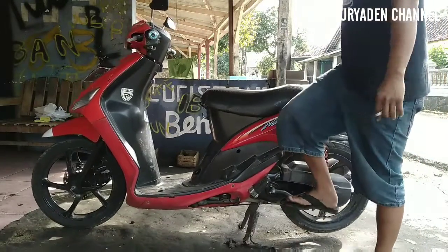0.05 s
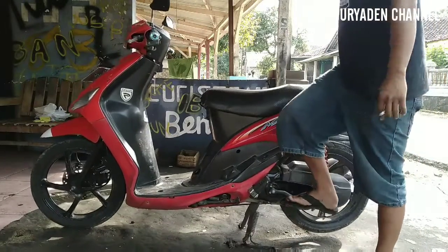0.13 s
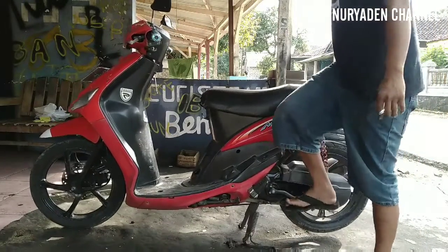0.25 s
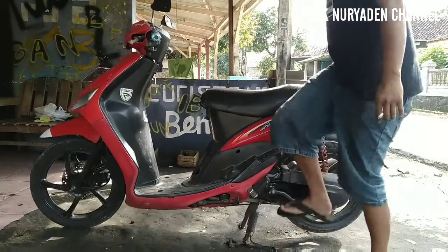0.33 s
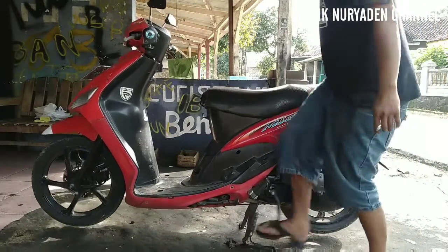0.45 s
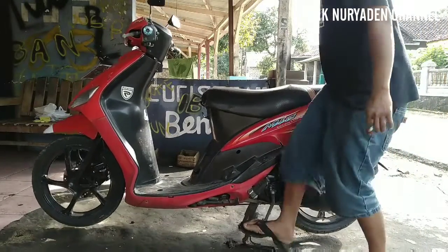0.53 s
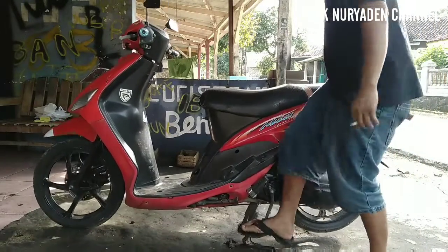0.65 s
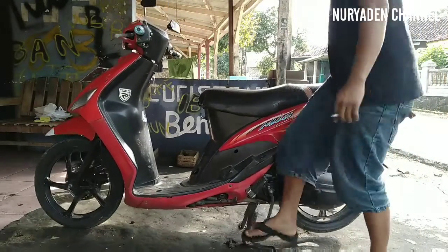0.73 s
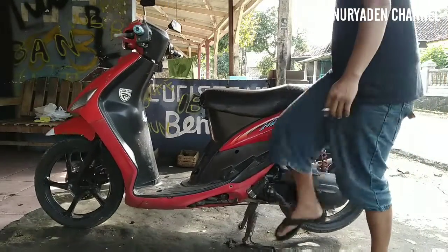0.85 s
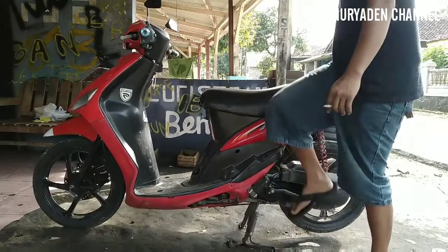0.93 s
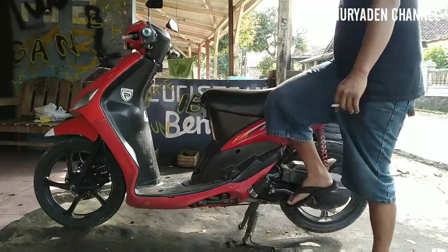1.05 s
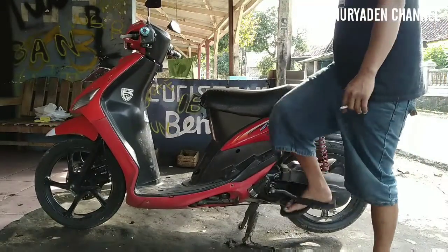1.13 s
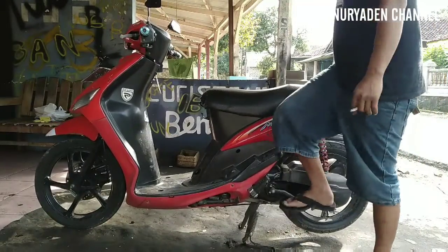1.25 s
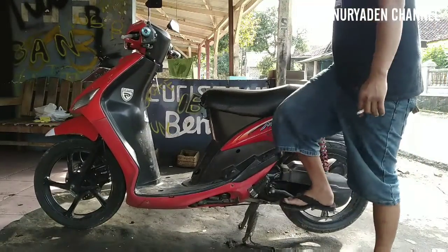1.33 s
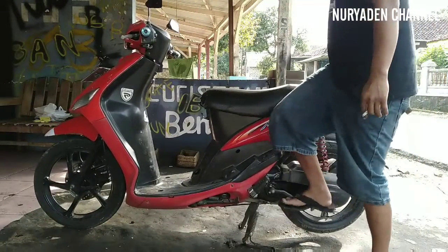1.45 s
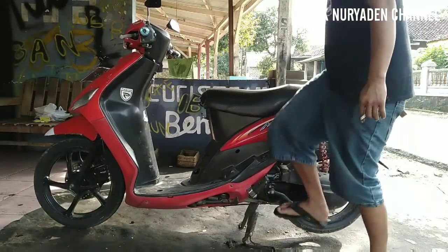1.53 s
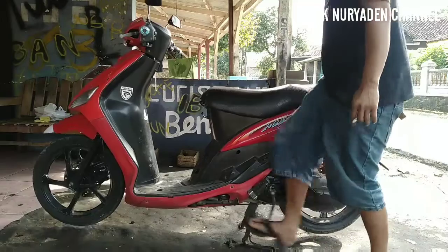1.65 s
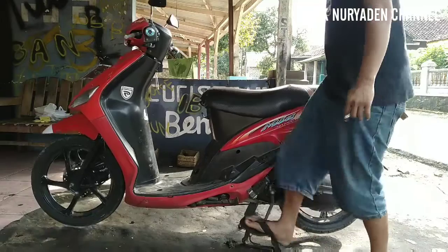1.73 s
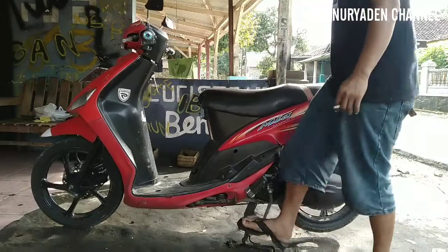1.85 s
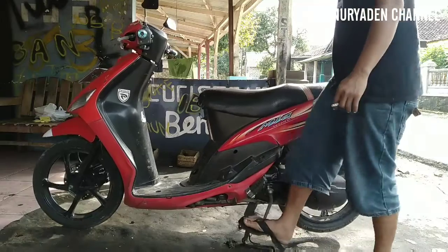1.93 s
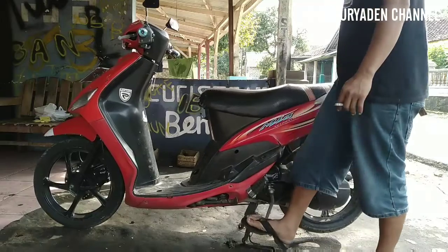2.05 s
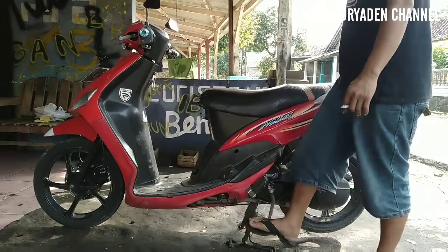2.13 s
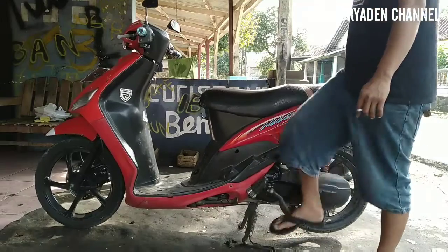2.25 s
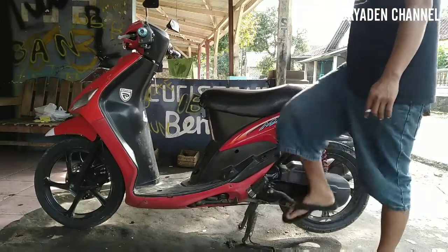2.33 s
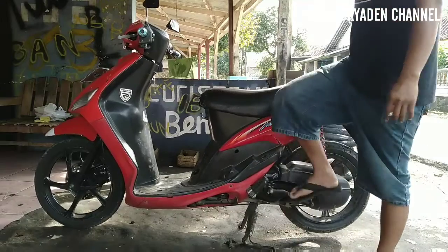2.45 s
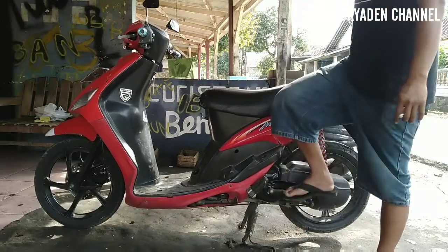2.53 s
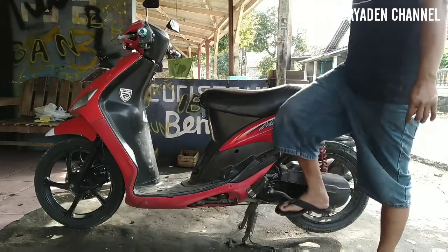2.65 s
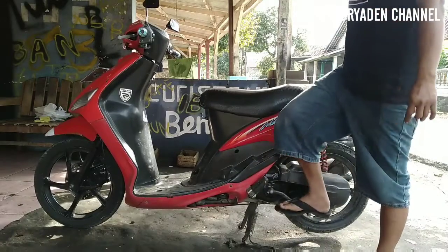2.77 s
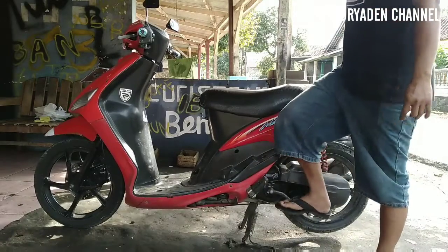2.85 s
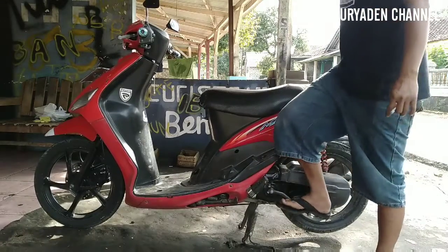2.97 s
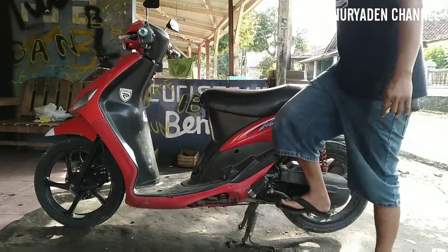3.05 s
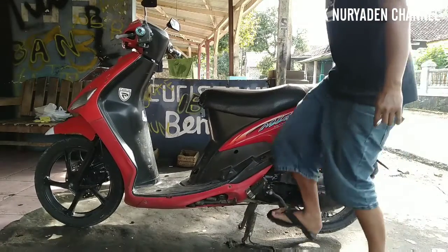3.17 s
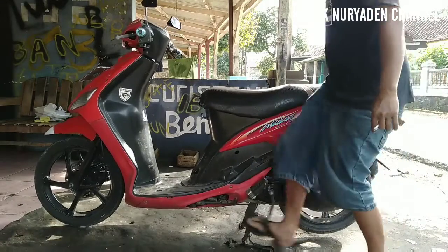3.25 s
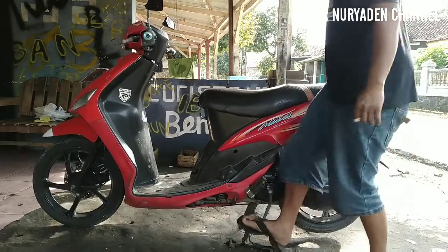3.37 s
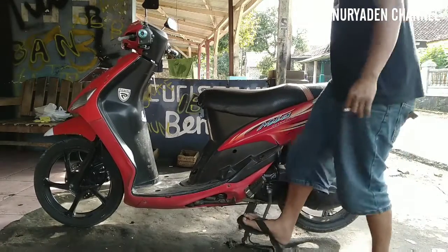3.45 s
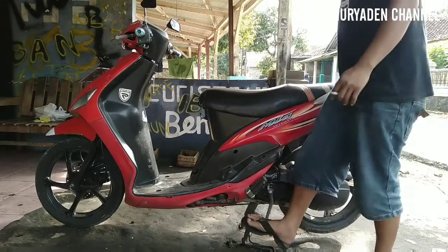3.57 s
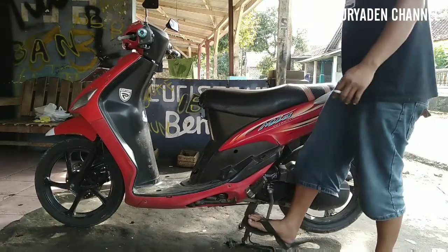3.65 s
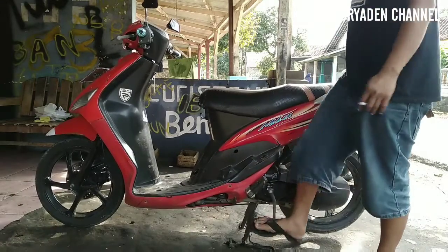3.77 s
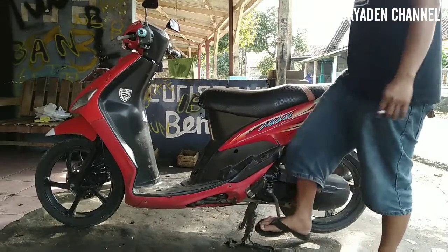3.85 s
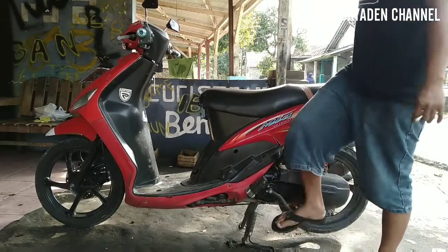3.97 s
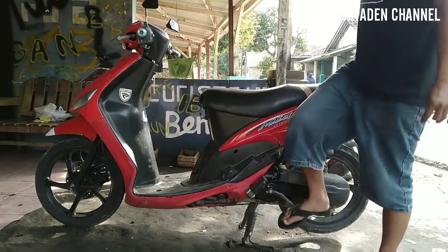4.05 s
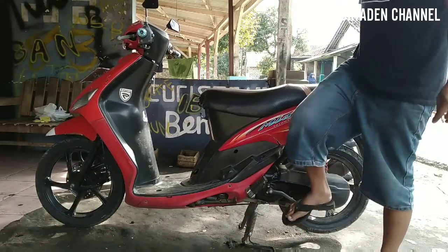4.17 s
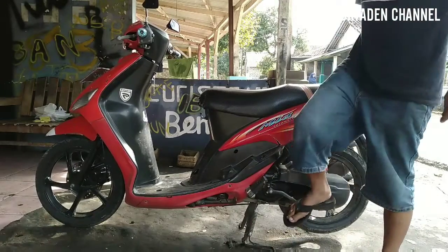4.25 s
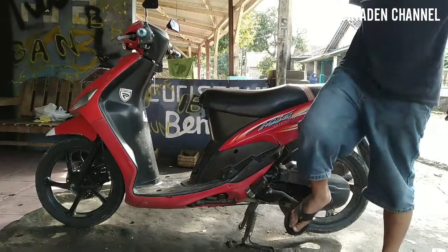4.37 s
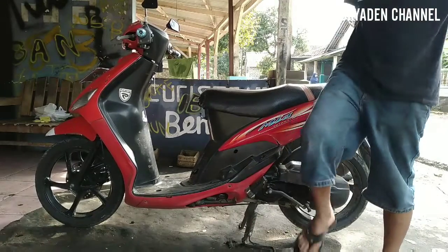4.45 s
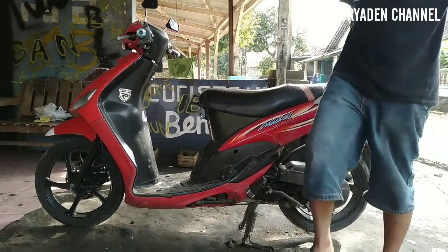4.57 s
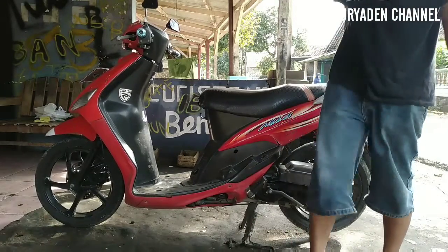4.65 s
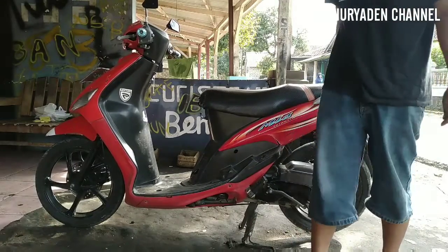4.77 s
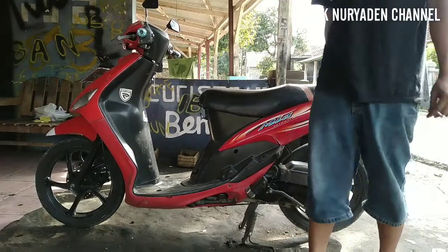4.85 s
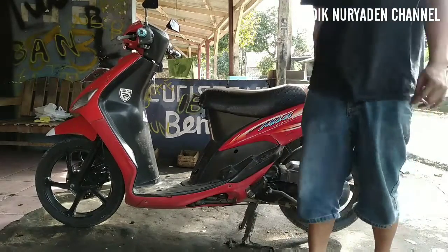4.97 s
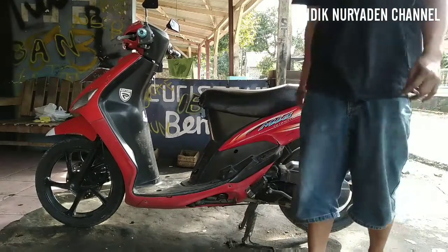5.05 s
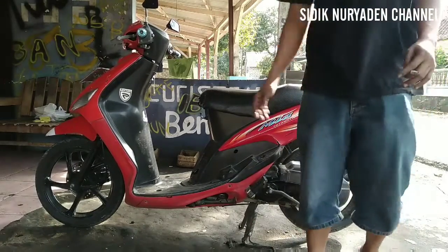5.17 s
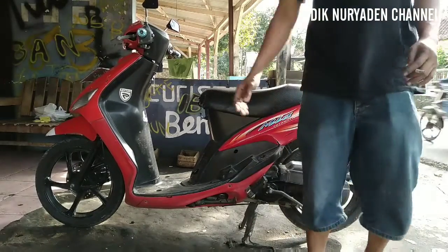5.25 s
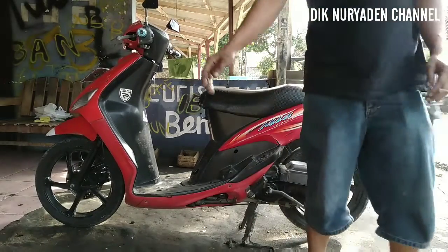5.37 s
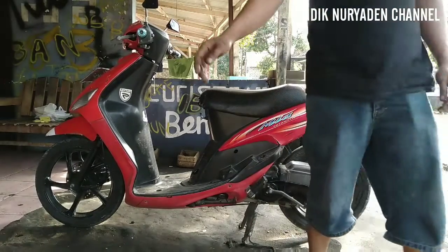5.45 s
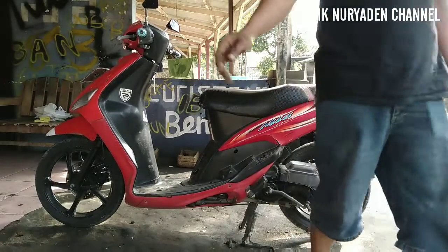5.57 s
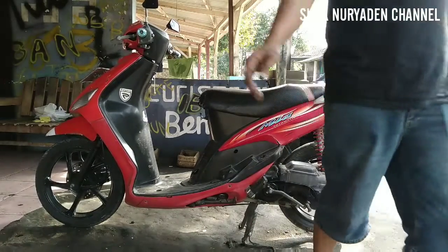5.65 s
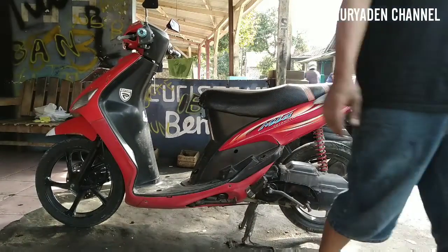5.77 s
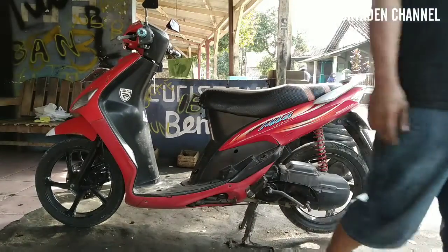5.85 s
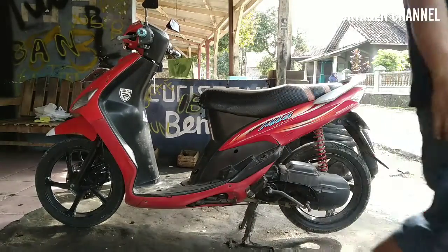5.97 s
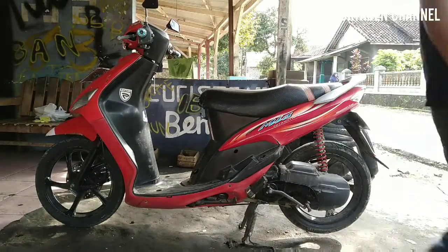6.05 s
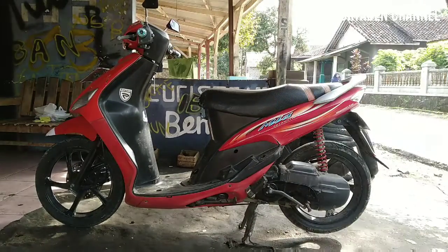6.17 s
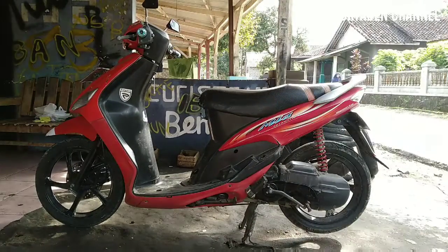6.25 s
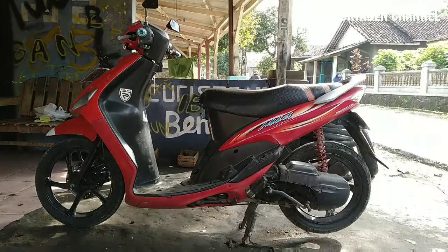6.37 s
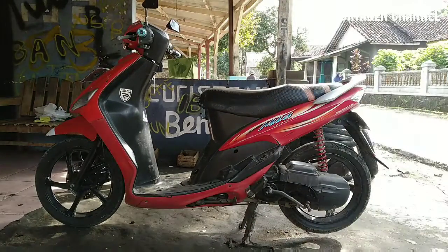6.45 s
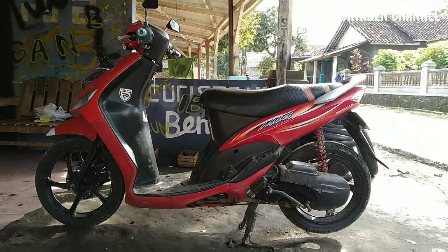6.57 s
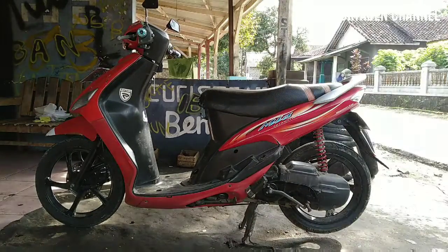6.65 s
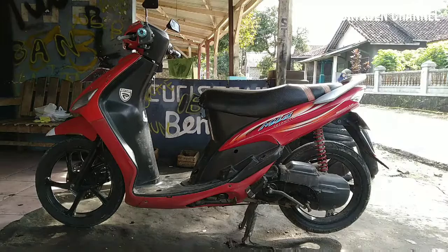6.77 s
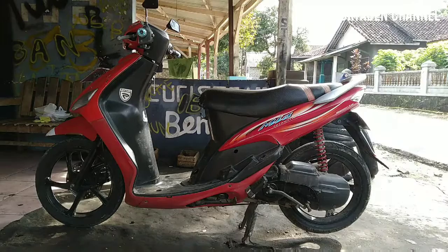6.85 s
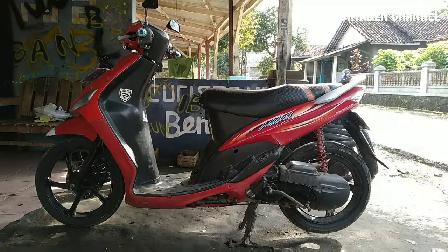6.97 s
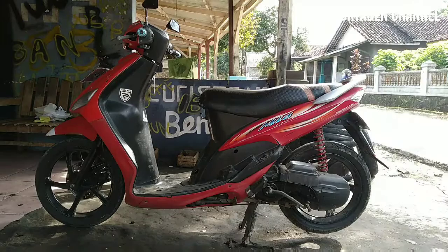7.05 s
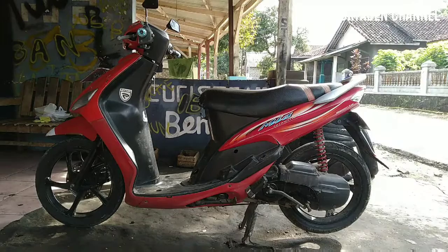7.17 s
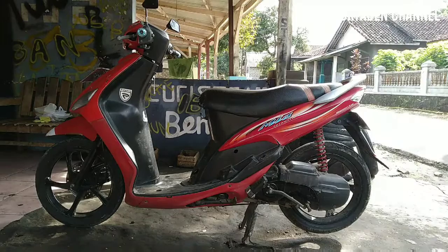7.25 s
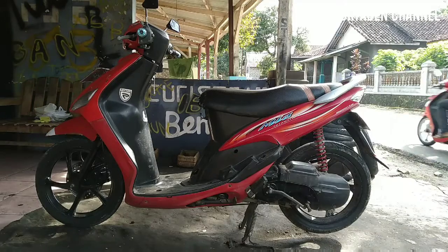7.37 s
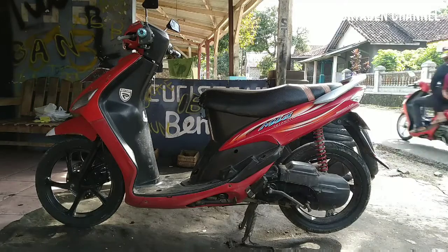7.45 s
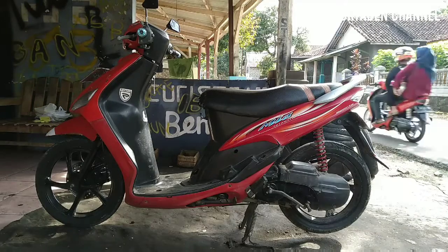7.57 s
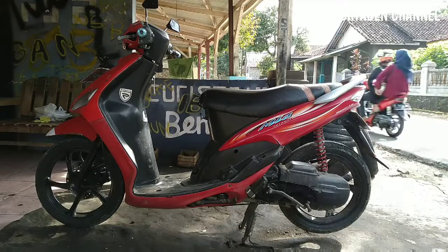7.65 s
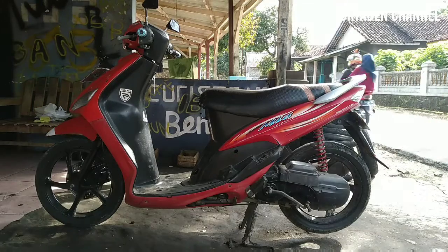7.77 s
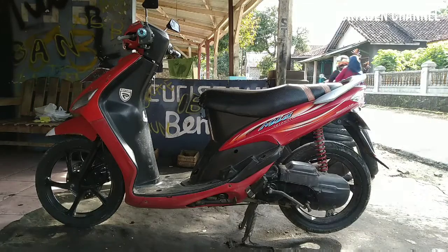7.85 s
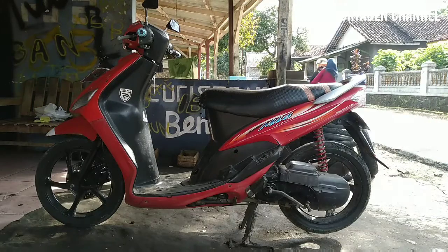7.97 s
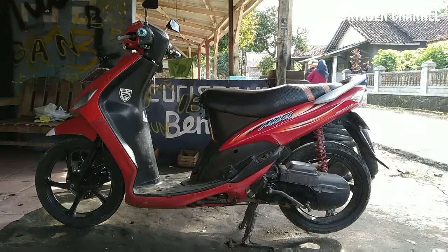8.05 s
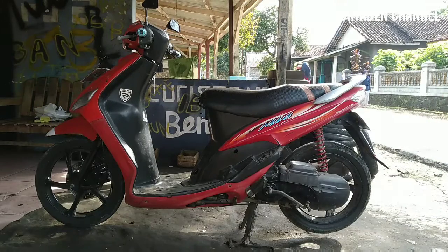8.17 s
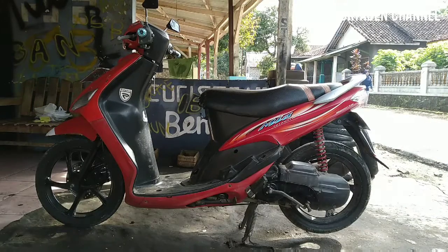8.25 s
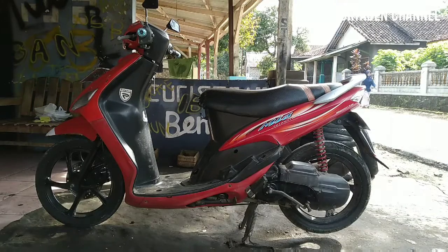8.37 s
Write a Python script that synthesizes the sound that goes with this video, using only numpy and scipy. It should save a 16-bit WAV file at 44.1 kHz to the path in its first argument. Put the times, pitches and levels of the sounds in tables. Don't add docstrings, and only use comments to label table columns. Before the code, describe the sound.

A scooter's kick lever is stamped three times with hard metallic clacks and gear scrapes, no engine catching, then motorcycles throb past on the road.

```python
import sys
import numpy as np
from scipy import signal
from scipy.fft import rfft, irfft, next_fast_len
from scipy.io import wavfile
from scipy.ndimage import uniform_filter1d

SR = 44100
rng = np.random.default_rng(int(sys.argv[2]) if len(sys.argv) > 2 else 0)


def convert_level_to_amplitude(level_db):
    exponent = np.asarray(level_db, float) / 20
    return 10 ** exponent


def master_out(mix):
    frames = np.transpose(np.atleast_2d(mix))
    ceiling = np.clip(frames, -1, 1)
    pcm = np.round(ceiling * 32767).astype(np.int16)
    wavfile.write(sys.argv[1], SR, pcm)


N = 370515

# time in seconds, firing rate in Hz, level in dB, pipe facing as tilt in dB per octave.
NEAR = [(0, 40.98, -46, 20), (0.6, 40.73, -45.5, 9.5), (2, 41.4, -49, 0.5), (2.7, 40.88, -46.5, 1),
        (3.3, 41.14, -41.5, 10), (3.9, 41.1, -44.5, -5), (4.4, 41.56, -36.5, 3.5),
        (4.9, 41.31, -43.5, -3.5), (5.4, 41.6, -37.5, -0.5), (5.8, 41.12, -34.5, 1.5),
        (6.2, 40.98, -34, 1.5), (6.5, 40.95, -32, -0.5), (6.8, 40.9, -32.5, -1), (7.05, 40.2, -29.5, 4),
        (7.27, 39.93, -34, -1), (7.45, 39.7, -35, -1.5), (7.6, 39.47, -32, 9), (7.8, 39.28, -34.5, 10),
        (8.1, 39.2, -36, 16), (8.4, 39.14, -39.5, 34)]
THROB = [(3.1, 25.75, -48, -12), (3.4, 26.04, -44.5, 0), (3.7, 26.3, -40.5, -6), (4.0, 26.38, -41.5, 1),
         (4.2, 26.54, -40, 16), (4.43, 26.78, -35.5, -2), (4.62, 26.78, -33.5, 9), (4.82, 26.68, -37, 6),
         (5.0, 26.5, -39, 25), (5.2, 26.21, -36.5, 19), (5.45, 26.07, -36.5, 2), (5.75, 26.17, -35.5, -9),
         (6.0, 26.18, -39.5, -10), (6.19, 26.36, -39, 1), (6.7, 26.66, -54, 0), (7.4, 26.98, -53, -12),
         (8.4, 27.67, -46.5, -12)]
LEAVING = [(0.0, 34.43, -43, -0.5), (0.53, 35.2, -39.5, 6.5), (0.9, 34.88, -47.5, 3),
           (1.35, 34.9, -51, -2.5), (2.13, 35.17, -57, -1), (2.67, 35.84, -53, 8), (3.2, 35.6, -60, 6)]
COMING = [(0.9, 31.7, -55, 10), (1.3, 31.7, -48.5, 19), (1.8, 31.9, -46, 8), (2.15, 32.02, -51, 2),
          (2.3, 31.66, -46.5, -3), (2.5, 29.57, -48.5, -4), (2.72, 28, -47, 2), (2.92, 32.93, -48, -6),
          (3.1, 33, -49, -4)]
# firing order as a number, level in dB.
NEAR_PIPE = [(1, -45), (2, 0), (3, -12), (4, -2.5), (5, -4.5), (6, -11), (7, -24), (8, -35), (9, -20),
             (10, -20.5), (11, -19.5), (12, -20.5), (13, -21), (14, -24.5), (15, -38), (16, -40),
             (17, -28.5)]
THROB_PIPE = [(1, -24), (2, -10), (3, -44), (4, -5.5), (5, 5.5), (6, 0.5), (7, -16), (8, -20), (9, -19.5),
              (10, -11.5), (11, -13.5), (12, -15), (14, -31), (15, -19.5)]
LEAVING_PIPE = [(1, -6), (2, 0), (3, -6.5), (5, -1), (6, -23), (8, -16.5), (9, -13), (10, -15.5),
                (11, -13.5), (12, -13)]
COMING_PIPE = [(1, -5), (2, -8), (3, -6.5), (4, 4.5), (5, -0.5), (6, -11), (7, -18), (10, -14.5), (11, -20)]
# time in seconds, upper mode over lower in dB,
# centre of its bark in Hz, bark in dB.
SLIDE = [(0, 2, 450, 3), (1.4, 1, 445, 9.5), (3.2, 0, 441, 8.5), (4.2, 2, 397, 8), (5.6, -9, 370, 1),
         (5.9, -6, 368.6, 3), (6.03, -7, 400, 6), (6.21, 2.5, 384.9, 10), (6.55, 2.5, 400, 8),
         (6.75, 6, 410, 9), (7.04, -0.5, 420, 3), (7.27, 9.5, 481, 3), (7.39, -7.5, 475, 8.5),
         (7.63, 2, 476.7, 8), (7.77, -15.5, 480, 5), (7.98, 11.5, 489.2, 10), (8.14, 2.5, 511.4, 8),
         (8.4, 4, 459.6, 8)]
STILL = [(0, 0, 400, 0)]
# lower in Hz, upper in Hz.
AIR_HZ = (161, 201)
AIR_WIDE_HZ, BARK_WIDE_HZ = 16, 60
DULL = 0.44
# time in seconds, left over right in dB.
SIDEWAYS = [(0, -1), (4, -2), (6, -2.5), (7.2, 2), (8.4, -2.5)]
PASSING = [(3.74,), (7.7,)]

# time in seconds, nearness in dB, speed as brightness in dB.
ROAD = [(0.0, -52.5, 6), (0.5, -54, 2.5), (0.96, -52, 0.5), (1.4, -58, 3), (1.82, -52.5, 0.5),
        (2.43, -58.5, 0.5), (3.04, -56.5, 0), (3.5, -51, 1.5), (3.88, -49.5, 2), (4.3, -44, 3),
        (4.85, -40, 4.5), (5.47, -45.5, 1), (5.85, -44.5, -2.5), (6.39, -40, -4.5), (6.69, -38, -2.5),
        (6.95, -38.5, -2.5), (7.05, -39, -5), (7.18, -38.5, -1), (7.34, -38.5, -5), (7.74, -42.5, -2.5),
        (8.4, -50, -5)]
# frequency in Hz, density in dB per Hz.
RUMBLE = [(40, -8), (70, -6.5), (150, 2), (240, -4.5), (330, -5.5), (500, -7), (800, -19), (1200, -120)]
TYRES = [(300, -120), (600, 1.5), (1000, 3.5), (1600, 0), (2500, -4.5), (3300, -6), (4300, -6),
         (6000, -17.5), (9000, -120)]
HISS = [(2500, -120), (4000, -4), (6000, 4), (9000, -2), (12000, -2), (14000, -6), (17000, -11.5)]
# frequency in Hz, left-right likeness from 0 to 1.
ALIKE = [(60, 1), (200, 1), (500, 0.44), (2000, 0.046), (15000, 0.053)]
RUMBLE_DB, RUMBLE_YIELDS = 3, 0.12
RUMBLE_TRAILS = 0.2

# frequency in Hz, density in dB per Hz.
BUFFET = [(8, -26), (28, 5.5), (42, 0.5), (120, -3), (250, -13), (450, -48), (800, -120)]
CALM_DB = -60
# start in seconds, peak in dB, rise in seconds, hold in seconds, fall in seconds (20 dB each way).
GUSTS = [
    (.54, -51, 0.12, .01, .22),
    (1.69, -55, 0.097, 0.011, 0.48),
    (2.638, -47, 0.35, 0.0087, 0.21),
    (3.018, -57, 0.11, 0.011, .1),
    (3.325, -62, .25, 0.22, 0.7),
    (4.708, -36.5, 0.62, 0.69, 0.096),
    (5.94, -40, 2.5, 0.89, 0.96),
    (7.652, -29.5, 0.62, .01, 0.63),
    (8.159, -34, 0.21, 0.0093, 0.68),
]

# time in seconds, peak in dB, low clank in dB.
TICKS = [(0.3705, -23.5, -14), (0.4643, -30, -21), (0.7324, -42, -9), (.8105, -30, -5), (0.844, -21, -20),
         (0.8574, -21.5, -20), (1.156, -22, -18), (1.1822, -18, -15), (1.2952, -41.5, 6),
         (1.5162, -29, -27), (1.7842, -28, -11), (1.815, -19, -8), (1.8515, -32, -3), (2.237, -27.5, -13),
         (2.258, -34, -9), (2.3645, -31.5, -16), (2.384, -31, -14), (2.4017, -38, -14),
         (2.4207, -32.5, -10), (2.651, -23, -17), (2.661, -30, -7), (2.71, -21.5, -12), (3.572, -26, -6),
         (3.598, -28, -6), (3.617, -29, -5), (3.641, -29, -6), (3.658, -30, -6), (1.745, -22, -4),
         (1.762, -25, -9), (1.879, -28, -6), (1.892, -30, -7), (.7775, -32, -8), (.826, -28, -8),
         (0.547, -20, -8), (3.331, -19, -3), (5.143, -23, -20), (7.6292, -21, -10.5)]
# time in seconds, peak in dB, low clank in dB, ring in dB, ring t60 in seconds.
CLACKS = [
    (0.5343, -1.5, -9.5, -14, 0.21),
    (1.731, -5.5, -7, -5, 0.11),
    (3.317, -1.5, -12.5, -9.5, 0.17),
]
REBOUNDS = [
    (0.7568, -20, -8.5, -4, 0.2),
    (3.5606, -19, -8, -7, 0.38),
]
CLACK_KNOCK_DB, REBOUND_KNOCK_DB = -28, -17.5
# centre in Hz, width in Hz, level in dB.
CASE = [(1420, 820, 5.5), (2084, 274, 8.5), (2290, 280, 5), (3490, 1840, -1)]
# frequency in Hz, density in dB per Hz.
STEEL = [(3000, -120), (4200, -12.5), (5300, -10.5), (6300, -9), (9000, -14.5), (13000, -14.5),
         (17000, -25)]
# centre in Hz, width in Hz, level in dB.
BODY = [(420, 330, 3), (870, 120, 0.5)]
# frequency in Hz, t60 in seconds.
SHED = [(300, 0.36), (2000, 0.3), (10000, 0.24)]

# start in seconds, length in seconds, level in dB,
# starting pitch in Hz, ending pitch in Hz.
MESH = [
    (.465, 0.032, -53, 1160, 1310),
    (0.77, 0.035, -29, 800, 900),
    (0.809, 0.019, -36, 1214, 1290),
    (0.819, .012, -36, 2160, 1900),
    (1.629, 0.032, -48, 1036, 1300),
    (1.823, 0.026, -33, 1000, 960),
    (1.865, 0.022, -31.5, 2100, 2050),
    (3.567, 0.038, -32, 784, 946),
]
# start in seconds, hold in seconds, scrape in dB, grind over it in dB, hum over it in dB.
GEARS = [(0.467, 0.067, -46, -8, 6.5), (0.766, 0.064, -32, -3, -8), (1.632, 0.012, -56, -13, 11.5),
         (1.679, 0.028, -45, -13, 3), (1.81, 0.072, -40, -1, 1), (1.86, 0.03, -33.5, -5, -9),
         (2.25, .01, -44.5, -23, -7.5), (2.71, .004, -44, -7, -1), (3.275, 0.085, -46, -8, 8),
         (3.398, 0.025, -42, -3.5, 0), (3.568, 0.065, -35.5, -2, -2.5)]
# centre in Hz, width in Hz, level in dB.
HOUSING = [(810, 260, 0), (1050, 330, -1), (1350, 450, -2)]
BITE_S, SLIP_S, COAST_S, COAST_DB = 0.021, 0.035, 0.59, -12.5

# time in seconds, peak in dB, pitch in Hz, t60 in seconds.
THUDS = [
    (.505, -27, 60.4, 0.13),
    (1.358, -21, 160, 0.056),
    (1.68, -26.5, 50, 0.18),
    (1.735, -35, 340, .06),
    (1.79, -35, 320, .06),
    (.78, -36, 390, .07),
    (2.831, -32, 200, 0.044),
    (3.288, -22.5, 62, 0.16),
    (3.408, -24, 318, 0.12),
    (7.719, -18, 306.2, 0.03),
]
# pitch in Hz, level in dB, t60 in seconds.
LEVER = [(1200, -21.5, 0.04), (1460, -17.5, 0.041), (1696, -16, 0.029), (1977, -12.5, .025),
         (2560, -8.5, 0.014), (3200, -23, .018), (3630, -39, 0.023), (4850, -34, .02), (5940, -22, .02),
         (6800, -26, .016), (7050, -19, 0.029)]
SPRING = [(1940, -30, 0.022), (2260, -21, 0.023), (4240, -29, 0.027)]
BUILD_S = 0.0086
# time in seconds, peak in dB, pitch in Hz, t60 in seconds.
PINGS = [(0.731, -34, 2450, 0.02), (1.293, -36, 2520, 0.018), (2.349, -44, 4100, .016),
         (2.366, -39, 4300, .016), (2.383, -42, 4000, .016), (2.401, -40, 4000, .016),
         (2.42, -39, 3900, .016), (2.437, -43, 4250, .016), (1.85, -28, 900, 0.027),
         (3.243, -34, 1270, 0.04), (3.679, -40, 1200, .05), (5.141, -27, 5255, 0.02),
         (5.116, -28.5, 7190, .025)]
PING_STRAY_HZ = 200

# start in seconds, hold in seconds, level in dB,
# blade passes per firing.
FAN = [
    (7.32, 0.36, -50, 26),
    (3.72, .52, -56, 30),
    (3.93, .45, -57, 20),
    (5.3, .28, -57, 30),
    (5.95, .3, -54, 20),
    (6.99, .28, -53, 38.5),
]
REV_S = 0.41
# start in seconds, hold in seconds, belt cover ring in dB.
CLATTER = [
    (3.797, 0.51, -57),
    (4.41, 0.7, -54),
    (5.2, 0.48, -49.5),
    (5.9, 0.42, -48.5),
    (6.46, 0.099, -51),
    (6.62, 0.21, -46),
    (7.1, 0.36, -45),
    (7.8, 0.46, -54),
]
# start in seconds, hold in seconds, then low, middle and
# high fin in dB.
FIN_BURSTS = [
    (6.297, 0.075, -54, -56, -56),
    (6.417, .13, -44.5, -52, -63),
    (6.58, 0.12, -48, -48, -47),
    (6.717, 0.087, -45, -50.5, -53),
    (6.83, 0.083, -46, -51.5, -50),
    (6.992, 0.32, -49, -54.5, -60),
    (7.32, 0.14, -55, -59, -57),
]
FIN_FADE_S = 0.065
# centre in Hz, width in Hz.
FINS = [(1620, 260), (2480, 520), (4300, 700)]
# centre in Hz, width in Hz, level in dB.
COVER = [(595, 165, -1.5), (824, 66, 4), (1240.5, 52, 3.5)]
# time in seconds, pitch in Hz, level in dB.
WHINE = [(5.6, 10970, -61), (6.3, 10840, -62), (6.8, 10500, -70), (7.3, 10550, -59), (7.6, 10550, -58),
         (8.4, 10560, -69)]
# time in seconds, peak in dB, pitch in Hz.
SLAPS = [
    (7.84, -18, 147),
    (8.176, -22, 96.1),
]

# centre in Hz, width in Hz, level in dB.
LEFT_PORT = [(7356, 730, 14), (2570, 590, -7.5), (15000, 810, 7)]
RIGHT_PORT = [(10550, 1080, 11), (2240, 340, -10.5)]
# frequency in Hz, gain in dB.
LEFT_SHADE = [(200, 1), (5000, 1), (8500, 1.5), (10000, 0), (13000, -0.5), (16000, -5)]


def unit(x):
    return x / np.sqrt(np.mean(x ** 2) + 1e-20)


def along(points, hz):
    f, v = np.transpose(points)
    return np.interp(np.log(hz + 1), np.log(f + 1), v)


def curves(rows):
    s, *columns = np.transpose(rows)
    return [np.interp(np.arange(N) / SR, s, column) for column in columns]


def window(rows, fade):
    first, last = rows[0][0], rows[-1][0]
    return np.interp(np.arange(N) / SR, [first - fade, first, last, last + fade], [0, 1, 1, 0])


def swell(s, rise, hold, fall):
    knots = np.cumsum([s - 3 * rise, 3 * rise, hold, 3 * fall])
    out = np.zeros(N)
    at = np.arange(max(int(knots[0] * SR), 0), min(int(knots[-1] * SR), N))
    out[at] = convert_level_to_amplitude(np.interp(at / SR, knots, [-60, 0, 0, -60]))
    return out


def wobble(rate, size=N):
    knots = rng.standard_normal(int(N * rate / SR) + 4)
    return np.interp(np.linspace(0, N * rate / SR, size), np.arange(len(knots)), knots)


def filtered(x, response):
    m = next_fast_len(N + 8192)
    return irfft(rfft(x, m) * response(np.fft.rfftfreq(m, 1 / SR)), m)[..., :N]


def modes(peaks, f):
    total = 0
    for k, (centre, wide, db) in enumerate(peaks):
        total = total + (-1) ** k * convert_level_to_amplitude(db) * 1j * f * wide / (centre ** 2 - f ** 2 + 1j * f * wide)
    return total


def engine(table, pipe, bend, flutter_db, smear, slide=STILL):
    hz, level_db, tilt = (c[::16] for c in curves(table))
    trade_db, bark_hz, bark_db = (c[::16] for c in curves(slide))
    size = len(hz)
    turn = 2 * np.pi * np.cumsum(hz) * 16 / SR
    lag = 1.9

    def bell(f, centre, wide):
        return np.exp(-((f - centre) / wide) ** 2)

    out = np.zeros(size)
    for k, db in pipe:
        far_db = DULL * (level_db - level_db.max()) * np.clip(np.log2(k / bend[1]), 0, 1)
        level = db + level_db + tilt * np.log2(np.clip(k, *bend) / 5) + far_db
        lower, upper = (bell(k * hz, centre, AIR_WIDE_HZ) for centre in AIR_HZ)
        level += trade_db / 2 * (upper - lower) + bark_db * bell(k * hz, bark_hz, BARK_WIDE_HZ)
        level += flutter_db * k / 5 * wobble(7, size)
        out += convert_level_to_amplitude(level) * np.cos(k * turn - lag * np.sqrt(k) + smear * np.sqrt(k) * wobble(3, size))
    sound = np.sqrt(2) * signal.resample_poly(out, 16, 1)[:N] * window(table, 0.2)
    return sound, np.repeat(turn, 16)[:N]


def engines():
    near, beat = engine(NEAR, NEAR_PIPE, bend=(2, 5), flutter_db=0.6, smear=0.06, slide=SLIDE)
    throb, pulse = engine(THROB, THROB_PIPE, bend=(4, 6), flutter_db=0.9, smear=0.07)
    leaving, _ = engine(LEAVING, LEAVING_PIPE, bend=(2, 5), flutter_db=2.5, smear=0.5)
    coming, _ = engine(COMING, COMING_PIPE, bend=(3, 5), flutter_db=2, smear=0.3)
    drone = near + throb + leaving + coming
    left = convert_level_to_amplitude(curves(SIDEWAYS)[0]) * np.roll(drone, -round(0.00013 * SR))
    return np.array([left, drone]), beat, pulse


def rush(spectrum, lead, patchy_db):
    def response(hz):
        spread = np.arccos(np.clip(along(ALIKE, hz), -1, 1)) / 2
        return convert_level_to_amplitude(along(spectrum, hz)) * [np.cos(spread), np.sin(spread)]
    z = signal.stft(rng.standard_normal((2, N)), nperseg=512)[2]
    field = uniform_filter1d(rng.standard_normal(z.shape[1:]), size=6, axis=0)
    field = uniform_filter1d(field, size=14, axis=1)
    patchy = signal.istft(z * convert_level_to_amplitude(patchy_db * unit(field)), nperseg=512)[1][:, :N]
    mid, side = filtered(patchy, response)
    swing = np.pi / 2 * window(PASSING, 0.24)
    early = np.roll(mid + side, -round(lead * SR))
    left = np.cos(swing) * (mid + side) + np.sin(swing) * early
    return unit(np.array([left / np.sqrt(1 + np.sin(2 * swing) / 2), mid - side]))


def traffic(beat, pulse):
    tyre_db, bright_db = curves(ROAD)
    rumble_db = tyre_db + RUMBLE_DB - RUMBLE_YIELDS * bright_db - RUMBLE_TRAILS * (tyre_db - tyre_db.min())
    hiss_db = tyre_db + bright_db
    puff = 0.068 * np.cos(beat) + 0.19 * np.cos(pulse) * window(THROB, 0.32)
    gust = wobble(9)
    rumble = convert_level_to_amplitude(rumble_db + 3 + 0.8 * puff + 0.5 * gust) * rush(RUMBLE, lead=0.0004, patchy_db=0.9)
    tyres = convert_level_to_amplitude(tyre_db + 0.55 * puff + 0.55 * gust) * rush(TYRES, lead=0.00045, patchy_db=1.1)
    hiss = convert_level_to_amplitude(hiss_db - 5 + 3.1 * puff + 0.73 * gust) * rush(HISS, lead=0.00045, patchy_db=1.64)
    return rumble + tyres + hiss


def breeze():
    lumps = convert_level_to_amplitude(2.5 * np.array([wobble(14), wobble(14)]))
    ports = filtered(rng.standard_normal((2, N)), lambda f: convert_level_to_amplitude(along(BUFFET, f)))
    strength = convert_level_to_amplitude(CALM_DB) + sum(convert_level_to_amplitude(db) * swell(s, *shape) for s, db, *shape in GUSTS)
    return strength * unit(lumps * ports) * convert_level_to_amplitude([[0.7], [-0.7]])


def metal(low, high):
    case = filtered(low, lambda f: modes(CASE, f) * (1j * f / (1j * f + 1300)) ** 2)
    return case + filtered(high, lambda f: convert_level_to_amplitude(along(STEEL, f)))


def lever_strikes():
    t = np.arange(SR // 4) / SR
    low, high, knock = np.zeros((3, 2, N + SR))
    strikes = [(*row, CLACK_KNOCK_DB, 0.0047) for row in CLACKS]
    strikes += [(*row, REBOUND_KNOCK_DB, 0.0047) for row in REBOUNDS]
    strikes += [(s, db, low_db, -8, 0.08, -30, 0.0045) for s, db, low_db in TICKS]
    for s, db, low_db, ring_db, t60, knock_db, rattle_s in strikes:
        contact_s = 0.0024 if db < -20 else 0.0004
        rise = 1 - np.exp(-(t / contact_s) ** 2)
        rattle = np.exp(-(t / rattle_s) ** 2)
        fading = convert_level_to_amplitude(ring_db - 60 * t / t60) + convert_level_to_amplitude(0.5 - 60 * t / (0.23 * t60))
        shape = rise * (rattle + fading)
        noise = 0.49 * rng.standard_normal((3, 1, len(t))) + 1.18 * rng.standard_normal((3, 2, len(t)))
        start = round((s - 0.0007) * SR)
        at = slice(start, start + len(t))
        low[:, at] += convert_level_to_amplitude(db + low_db - 3) * shape * noise[0]
        high[:, at] += convert_level_to_amplitude(db - 9) * shape * noise[1]
        knock[:, at] += convert_level_to_amplitude(db + knock_db + 6) * shape * noise[2]
    frame = filtered(knock[:, :N], lambda f: modes(BODY, f))
    return metal(low[:, :N], high[:, :N]) + frame


def shed(x):
    hz, t, z = signal.stft(rng.standard_normal((2, SR // 2)), SR, nperseg=256)
    tail = signal.istft(z * convert_level_to_amplitude(-60 * t / along(SHED, hz)[:, None]), SR, nperseg=256)[1]
    delayed = np.pad(x, ((0, 0), (400, 0)))
    return signal.oaconvolve(delayed, tail / np.linalg.norm(tail[0]), axes=1)[:, :N]


def mesh():
    t, out = np.arange(N) / SR, np.zeros(N)
    stray_hz = 200 * wobble(400)
    rough = convert_level_to_amplitude(3.5 * wobble(300) - 7)
    for s, length, db, from_hz, to_hz in MESH:
        pitch = np.interp(t, [s, s + length], [from_hz, to_hz]) + stray_hz
        out += convert_level_to_amplitude(db) * swell(s, 0.0089, length, 0.0072) * np.cos(2 * np.pi * np.cumsum(pitch) / SR)
    return out * rough


def gears():
    hum, grind, scrape = np.zeros((3, N))
    for s, hold, db, grind_db, hum_db in GEARS:
        coast = convert_level_to_amplitude(COAST_DB) * swell(s, BITE_S, hold, COAST_S)
        stroke = convert_level_to_amplitude(db) * (swell(s, BITE_S, hold, SLIP_S) + coast)
        hum += convert_level_to_amplitude(hum_db + 9) * stroke
        grind += convert_level_to_amplitude(grind_db + 3.5) * stroke
        scrape += convert_level_to_amplitude(-2) * stroke
    noise = 0.5 * rng.standard_normal((3, 1, N)) + 0.57 * rng.standard_normal((3, 2, N))
    teeth = convert_level_to_amplitude([3 * wobble(350) + 1.2 * wobble(70) for _ in range(3)])
    housing = filtered(hum * teeth[2] * noise[2], lambda f: modes(HOUSING, f))
    return housing + metal(grind * teeth[0] * noise[0], scrape * teeth[1] * noise[1])


def thuds():
    out, t = np.zeros(N + SR), np.arange(SR // 4) / SR
    for s, db, hz, t60 in THUDS:
        shape = convert_level_to_amplitude(db - 60 * t / t60) * (1 - np.exp(-t / 0.007))
        out[round(s * SR):][:len(t)] += shape * np.sin(2 * np.pi * hz * t)
    return out[:N]


def lever_ring():
    out, t = np.zeros(N + SR), np.arange(SR // 4) / SR
    for blows, body in ((CLACKS, LEVER), (REBOUNDS, SPRING)):
        for s, db, *_ in blows:
            tones = np.zeros(len(t))
            for hz, level, t60 in body:
                fading = convert_level_to_amplitude(level + 2 * rng.standard_normal() - 60 * t / t60)
                build = 1 - np.exp(-(t / BUILD_S * (hz / 1000) ** 2) ** 2)
                tones += fading * build * np.sin(2 * np.pi * (hz * t + rng.random()))
            out[round(s * SR):][:len(t)] += convert_level_to_amplitude(db - blows[0][1]) * tones
    return out[:N]


def pings():
    out, t = np.zeros(N + SR), np.arange(SR // 4) / SR
    stray = 2 * np.pi * np.cumsum(PING_STRAY_HZ * wobble(500)) / SR
    for s, db, hz, t60 in PINGS:
        at = round(s * SR)
        shape = convert_level_to_amplitude(db - 60 * t / t60) * (1 - np.exp(-t / 0.0028))
        out[at:][:len(t)] += shape * np.sin(2 * np.pi * hz * t + hz / 4000 * stray[at:][:len(t)])
    return out[:N]


def fan():
    firing_hz = curves(NEAR)[0]
    turn, stray = 2 * np.pi * np.cumsum([firing_hz, 18 * wobble(60)], axis=1) / SR
    tones = np.zeros(N)
    for s, hold, db, passes in FAN:
        tones += convert_level_to_amplitude(db) * swell(s, REV_S / 2, hold, REV_S) * np.cos(passes * turn + stray)
    return convert_level_to_amplitude(2 * wobble(20)) * tones


def clatter(beat, pulse):
    cover_gain = sum(convert_level_to_amplitude(db) * swell(s, REV_S, hold, REV_S) for s, hold, db in CLATTER)
    fin_gain = np.zeros((len(FINS), N))
    for s, hold, *fin_db in FIN_BURSTS:
        fin_gain += convert_level_to_amplitude(fin_db)[:, None] * swell(s, FIN_FADE_S, hold, FIN_FADE_S)
    near_db = 4 * np.cos(beat + wobble(20)) + 2 * wobble(14) + 2 * wobble(60)
    throb_db = 3 * np.cos(pulse) + 1.5 * wobble(9)
    hits = rng.standard_normal((2, N)) * convert_level_to_amplitude([near_db, throb_db])
    ring = cover_gain * unit(filtered(hits[1], lambda f: modes(COVER, f) ** 2))
    for gain, (hz, wide) in zip(fin_gain, FINS):
        ring += gain * unit(filtered(hits[0], lambda f: modes([(hz, wide, 0)], f) ** 2))
    return np.array([np.roll(ring, -round(0.0004 * SR)), ring])


def whine():
    hz, db = curves(WHINE)
    turn = 2 * np.pi * np.cumsum(hz + 190 * wobble(600)) / SR
    line = convert_level_to_amplitude(db + 2.1 * wobble(150)) * np.cos(turn) * window(WHINE, 0.34)
    return line * convert_level_to_amplitude([[-9], [0]])


def slaps():
    out, t = np.zeros(N), np.arange(N) / SR
    for s, db, hz in SLAPS:
        v = (np.pi * hz * (t - s)) ** 2
        out += convert_level_to_amplitude(db) * ((1 - 2 * v) * np.exp(-v) + 0.22 * (1 - 12 * v) * np.exp(-6 * v))
    return out


def scene():
    drone, beat, pulse = engines()
    road = drone + traffic(beat, pulse) + fan() + clatter(beat, pulse) + whine()
    wind = breeze() + slaps()
    strokes = lever_strikes() + gears()
    scooter = strokes + convert_level_to_amplitude(-6.5) * shed(strokes) + mesh() + thuds() + lever_ring() + pings()
    return road + wind + scooter


def band_limit(x):
    return signal.sosfilt(signal.butter(12, 15850, fs=SR, output="sos"), x)


def record(dry):
    def ports(f):
        left = convert_level_to_amplitude(along(LEFT_SHADE, f)) * (1 + abs(modes(LEFT_PORT, f)))
        return [left, 1 + abs(modes(RIGHT_PORT, f))]
    heard = filtered(dry, ports)
    mix = heard / (1 + np.abs(heard) ** 12) ** (1 / 12)
    return band_limit(mix)


dry = scene()
out = record(dry)
master_out(out)
```